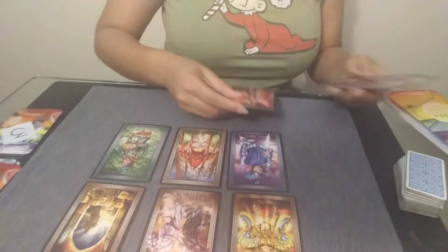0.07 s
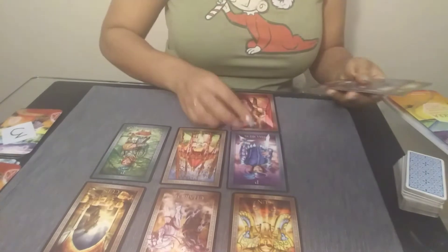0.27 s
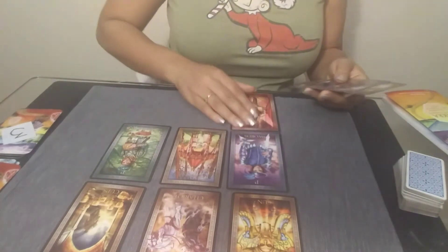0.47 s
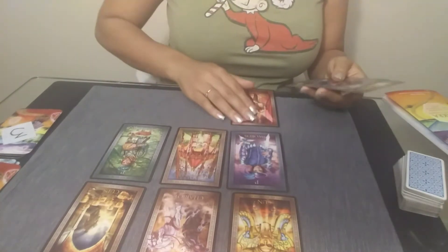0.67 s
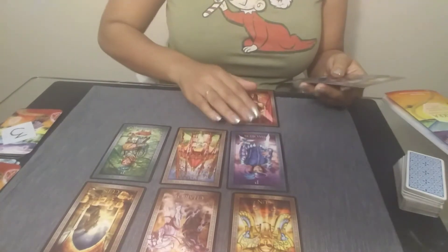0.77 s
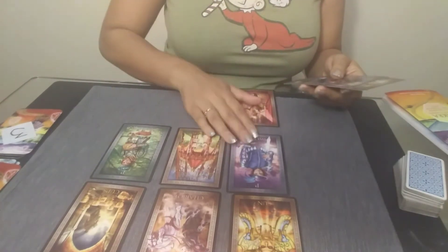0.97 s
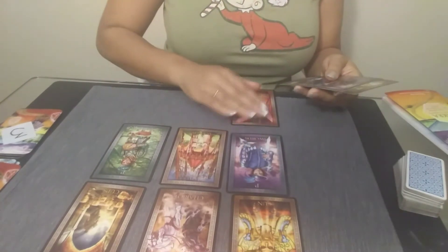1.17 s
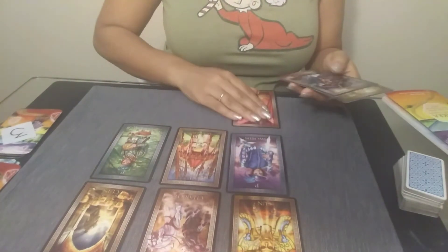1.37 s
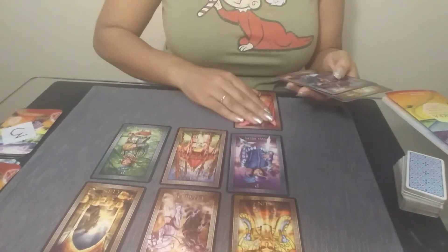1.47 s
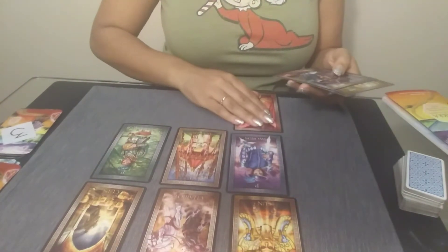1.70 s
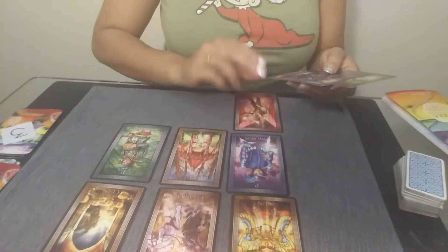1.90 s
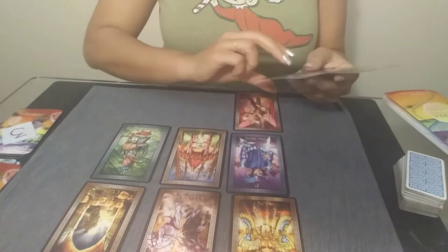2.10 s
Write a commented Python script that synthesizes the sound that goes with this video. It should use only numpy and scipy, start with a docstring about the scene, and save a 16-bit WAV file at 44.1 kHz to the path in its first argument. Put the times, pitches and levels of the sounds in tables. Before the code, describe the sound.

A playing card slides softly over a cloth mat from the start, with light taps near 0.06 and 0.2 seconds. It scrapes past a nail at 0.28 and snaps flat, loud and crisp, at 0.33. A nail click and nudge follow at 0.55, faint ticks and rubbing around 1.0 and 1.4, then a bright flick off the deck at 1.95. Small room, close microphone, low steady hiss.

```python
"""A stiff playing card, laid on a cloth mat, slides, is tapped down, bends past a fingernail and snaps flat.
Fingers nudge it straight and thumb the deck; the next card flicks off the deck's edge with a bright snap.
Blows and bursts of friction drive each card's resonances, whose dispersion delays the low bending waves;
sliding, taps and nails are coloured noise and impulses. A small, quiet room answers at one close microphone."""
import sys
import numpy as np
from scipy import signal
from scipy.fft import rfft, irfft, next_fast_len
from scipy.io import wavfile

SR = 44100
rng = np.random.default_rng(int(sys.argv[2]) if len(sys.argv) > 2 else 0)


def output_pcm(signal):
    """Save a mono or channel-first signal as 16-bit PCM at the path in sys.argv[1].

    Samples are clipped to [-1, 1] before scaling.
    """
    pcm = np.clip(np.atleast_2d(signal).T, -1, 1) * 32767
    wavfile.write(sys.argv[1], SR, np.round(pcm).astype(np.int16))


N = 94638


def amp(db):
    """Logarithmic level: decibels to amplitude gain."""
    return 10 ** (np.asarray(db) / 20)


def unit(x):
    """Power normalisation: x at rms 1."""
    return x / np.sqrt(np.mean(x ** 2) + 1e-20)


def along(points, hz):
    """Interpolation of (f/Hz, value) points on a logarithmic frequency axis."""
    point_hz, values = np.transpose(points)
    return np.interp(np.log(hz + 1), np.log(point_hz + 1), values)


def filtered(x, response):
    """Linear filtering: the spectrum of x times a complex response of frequency."""
    size = 2 * next_fast_len(N // 2 + SR // 4)  # padded so that ringing does not wrap round
    hz = np.fft.rfftfreq(size, 1 / SR)
    return irfft(rfft(x, size) * response(hz), size)[:N]


def causal(db):
    """Minimum phase: the response with these gains that only rings after its cause."""
    cepstrum = irfft(db * np.log(10) / 20)
    half = len(cepstrum) // 2
    # fold the negative times onto the positive ones
    cepstrum[1:half] *= 2
    cepstrum[half + 1:] = 0
    return np.exp(rfft(cepstrum))


def tinted(x, colour):
    """Broadband spectral shaping: x through a causal filter with a (f/Hz, level/dB) colour."""
    return filtered(x, lambda hz: causal(along(colour, hz)))


def card(force, colour, modes, spread_s):
    """Plate bending: resonances lift a broad colour, and dispersion makes low bending waves arrive late."""
    def response(hz):
        db = along(colour, hz)
        for centre, width, lift in modes:
            db = db + lift / (1 + (2 * (hz - centre) / width) ** 2)
        # this phase is a delay of spread_s at 1 kHz, falling as one over the root of frequency
        lag = 4 * np.pi * spread_s * np.sqrt(1000 * hz)
        return causal(db) * np.exp(-1j * lag)
    return filtered(force, response)


def blows(rows):
    """Impulsive excitation: one single-sample force for each (t/s, level/dB)."""
    force = np.zeros(N)
    for s, db in rows:
        force[int(s * SR)] += amp(db)
    return force


def stroke(s, length):
    """Contact pressure envelope: a rounded rise and fall that peaks at 1."""
    swell = 0.44  # exponent: smaller gives steeper ends and a flatter top
    progress = np.clip((np.arange(N) / SR - s) / length, 0, 1)
    return (4 * progress * (1 - progress)) ** swell


def friction(grain):
    """Dry friction: dense tiny slips of uneven size, with log-normal spread grain (nepers)."""
    slips = rng.standard_normal(N)
    sizes = np.exp(grain * rng.standard_normal(N))
    return unit(slips * sizes)


def scrapes(rows):
    """Energy equivalence: each friction burst carries the energy of a blow of the same dB."""
    force = np.zeros(N)
    for s, length, db in rows:
        burst = stroke(s, length) * friction(grain=0.61)
        force += amp(db) * burst / np.linalg.norm(burst)
    return force


def room(x, wet_db, walls_db):
    """Room acoustics: direct sound, early reflections and a frequency-dependent diffuse decay."""
    # near surfaces, before colour and walls_db: t/s (delay), level/dB
    walls = [(.0057, -13), (.0076, -13.5), (.0106, -20.5), (.0132, -8.5)]
    # spectrum of those reflections: f/Hz, level/dB
    wall_colour = [(500, -0.5), (3000, 5), (10000, -13.5)]
    # time for the tail to fall by 60 dB: f/Hz, t/s
    decay_times = [(200, 0.16), (1000, 0.46), (3000, 0.26), (6000, 0.26), (13000, 0.21)]
    # spectrum of the diffuse sound, before wet_db: f/Hz, level/dB
    diffuse_colour = [(100, -1.5), (500, 1.5), (1200, -6), (3000, -2), (6000, -2.5), (12000, -7)]
    onset_s = 0.0021  # build-up time of the tail

    hz, t, noise = signal.stft(rng.standard_normal(SR // 2), SR, nperseg=256)
    decay = amp(-60 * t / along(decay_times, hz)[:, None])
    tail = signal.istft(noise * decay, SR, nperseg=256)[1]
    tail *= 1 - np.exp(-(np.arange(len(tail)) / SR / onset_s) ** 2)
    tail /= np.linalg.norm(tail)
    diffuse = tinted(signal.fftconvolve(x, tail)[:N], diffuse_colour)
    echoes = tinted(signal.fftconvolve(x, blows(walls))[:N], wall_colour)
    return x + amp(wet_db) * diffuse + amp(walls_db) * echoes


def air():
    """Stationary random noise: steady room noise and microphone hiss of fixed spectral density."""
    # relative spectral density: f/Hz, level/dB per Hz
    density = [(25, -31), (75, -38), (115, -28.5), (150, -8), (200, -9), (260, -3.5), (400, -6),
               (1000, -6.5), (1700, -12), (2800, -17), (4600, -18.5), (5600, -28), (8000, -27.5),
               (10500, -24), (15500, -26.5)]
    level_db = -64.5  # rms
    noise = filtered(rng.standard_normal(N), lambda hz: amp(along(density, hz)))
    return amp(level_db) * unit(noise)


def sliding():
    """Sliding friction: card faces hiss softly on cloth and deck, their loudness following the stroke."""
    # strokes: t/s, length/s, level/dB (rms at the stroke's peak, before the room)
    slides = [(-.04, .135, -59.5), (0.198, .03, -68), (0.219, .07, -62), (0.526, 0.13, -62.5),
              (0.738, 0.029, -69), (0.96, .12, -69.5), (1.359, 0.29, -67.5), (1.767, 0.025, -72),
              (1.815, 0.046, -68.5)]
    # relative spectrum of the hiss: f/Hz, level/dB
    slide_colour = [(90, -46), (250, -2), (500, -1), (1500, 0.5), (4000, 2.5), (5700, -1.5), (9800, 1),
                    (12500, -8), (15500, -6.5)]
    pressure = sum(amp(db) * stroke(s, length) for s, length, db in slides)
    hiss = unit(tinted(friction(grain=0.24), slide_colour))
    return room(pressure * hiss, wet_db=-1, walls_db=-14)


def fingers():
    """Contact excitation: brief friction makes taps, pats and nail drags; impulses make nail ticks."""
    # Levels of events are before their colour.
    # fingers and card touching the mat: t/s, length/s, level/dB
    touches = [(.056, 0.019, -5), (.184, 0.0051, -7.5), (.190, 0.0053, -10), (.2315, .008, -2)]
    # their spectrum: f/Hz, level/dB
    touch_colour = [(100, -54), (260, -13), (1000, -13), (2600, -16), (6000, -31.5), (9700, -25),
                    (15000, -40)]
    # soft pats of a fingertip and of the air under the landing card: t/s, length/s, level/dB
    soft_pats = [(.221, .016, 2.5), (.329, .012, 9.5)]
    # their spectrum: f/Hz, level/dB
    pat_colour = [(70, -38), (130, -20.5), (350, -15.5), (900, -13), (2000, -30), (8000, -45)]
    # nail ticks on the card: t/s, level/dB
    nail_ticks = [(.232, -1.5), (.5353, -13), (.558, -2.5), (.5635, -12), (.9538, -11.5), (.9712, -10),
                  (.9995, -10.5), (1.3695, -15.5)]
    # their spectrum: f/Hz, level/dB
    tick_colour = [(80, -51), (700, -35), (1600, -25), (3500, -17.5), (6000, -32), (10000, -25.5),
                   (15000, -53)]
    # nails dragging over the card: t/s, length/s, level/dB
    nail_drags = [(.057, 0.038, -11), (.190, 0.012, -11.5), (.5345, 0.0051, -12.5), (.555, 0.0099, -2.5),
                  (.96, 0.043, -6.5)]
    # their spectrum: f/Hz, level/dB
    drag_colour = [(150, -35), (700, -28), (1500, -16.5), (3800, -14.5), (6000, -22.5), (15000, -40)]

    taps = tinted(scrapes(touches), touch_colour)
    pats = tinted(scrapes(soft_pats), pat_colour)
    ticks = tinted(blows(nail_ticks), tick_colour)
    drags = tinted(scrapes(nail_drags), drag_colour)
    return room(taps + pats, wet_db=-3.5, walls_db=-4.5) + room(ticks + drags, wet_db=-6.5, walls_db=-3)


def laid_card():
    """Driven plate resonance: nail friction rings the bent card, then slips and a blow ring it flat."""
    # scraping past the nail, ringing higher as the card tightens: t/s, length/s, level/dB, pitch ratio
    bends = [(0.2797, 0.0053, -13.5, 0.82), (0.2826, 0.0052, -3, 1), (0.285, 0.0096, 0.5, 1.01),
             (0.3, .024, -13, 1.2)]
    # bent card's broad spectrum: f/Hz, level/dB
    bend_colour = [(90, -60), (250, -12), (700, -14.5), (1400, -10.5), (3000, -8.5), (6000, -20.5),
                   (9700, -16), (12000, -26), (15000, -37)]
    # bent card's resonances at pitch ratio 1: f/Hz, width/Hz, lift/dB
    bend_modes = [(1092, 137, 13.7), (1860, 170, 13.7), (2750, 250, 13.7), (4870, 340, 9.3)]
    # corner slipping just before it lets go and chattering as it lands: t/s, length/s, level/dB
    slips = [(.3218, 0.0051, -14.5), (.3277, .002, -7)]
    # flat card's broad spectrum: f/Hz, level/dB
    snap_colour = [(30, -21), (100, -25), (200, -8), (600, -10.5), (1300, -4.5), (2300, 7.5), (4200, 5.5),
                   (5500, 1), (9000, 0.5), (12000, -1), (15500, -15.5)]
    # flat card's resonances: f/Hz, width/Hz, lift/dB
    snap_modes = [(1920, 140, 3), (2620, 170, 3.5), (2860, 110, 6.5), (3254, 114, 8.1), (4120, 220, 2.9),
                  (4370, 110, 1.8), (9260, 230, 5.2)]
    snap_s, snap_db = .3274, -0.5  # time and level of the blow
    spread_s = .0005  # lag of bending waves at 1 kHz

    bend = np.zeros(N)
    for s, length, db, ratio in bends:
        scaled_modes = np.array(bend_modes) * [ratio, 1, 1]
        bend += card(scrapes([(s, length, db)]), bend_colour, scaled_modes, spread_s)
    force = blows([(snap_s, snap_db)]) + scrapes(slips)
    snap = card(force, snap_colour, snap_modes, spread_s)
    return room(bend, wet_db=-6, walls_db=-2) + room(snap, wet_db=-1.5, walls_db=-2.1)


def drawn_card():
    """Dispersive plate release: the next card scrapes over the deck's edge and springs free."""
    # card's edge catching and leaving the deck: t/s, level/dB
    catches = [(1.9478, -8.5), (1.9488, -7.5), (1.9512, -9.5), (1.952, -9)]
    # its scrape over the edge: t/s, length/s, level/dB
    edge_scrapes = [(1.9443, 0.0042, -7), (1.9466, 0.00615, -1.5)]
    # drawn card's broad spectrum: f/Hz, level/dB
    flick_colour = [(40, -39), (250, -16.5), (700, -17), (1100, -10.5), (2000, -8), (3200, -10), (4000, -5),
                    (4500, 1), (7000, 1.5), (7800, -1), (10900, -4), (11800, -16), (13500, -11),
                    (15500, -22)]
    # its resonances: f/Hz, width/Hz, lift/dB
    flick_modes = [(3540, 110, 11.5), (4550, 200, 7.5), (5244, 180, 12), (5466, 210, 12), (6680, 370, 10),
                   (7200, 230, 4.5), (8950, 200, 13)]
    spread_s = 0.002045  # lag of bending waves at 1 kHz
    force = blows(catches) + scrapes(edge_scrapes)
    flick = card(force, flick_colour, flick_modes, spread_s)
    return room(flick, wet_db=-2, walls_db=-5)


def scene():
    """Superposition: all sound pressures add at the one microphone."""
    return (laid_card() + drawn_card() + fingers() + sliding() + air())[None]


def record(dry):
    """Band limitation: a very steep zero-phase low-pass."""
    top_hz = 15550  # 3 dB down here
    return np.array([filtered(x, lambda hz: 1 / np.sqrt(1 + (hz / top_hz) ** 160)) for x in dry])


dry = scene()
out = record(dry)
output_pcm(out)
```